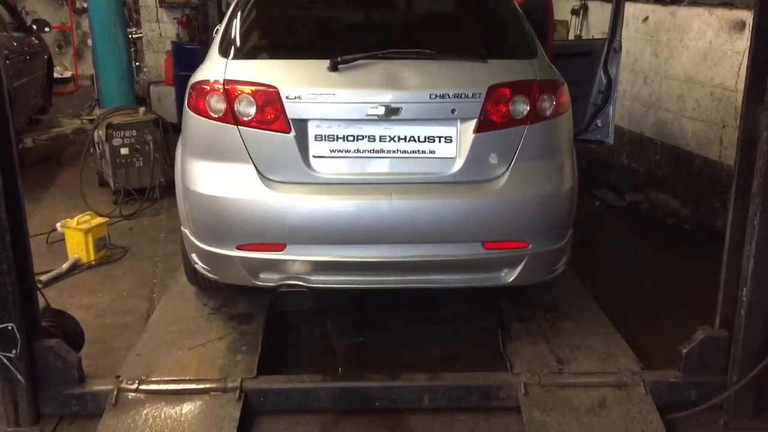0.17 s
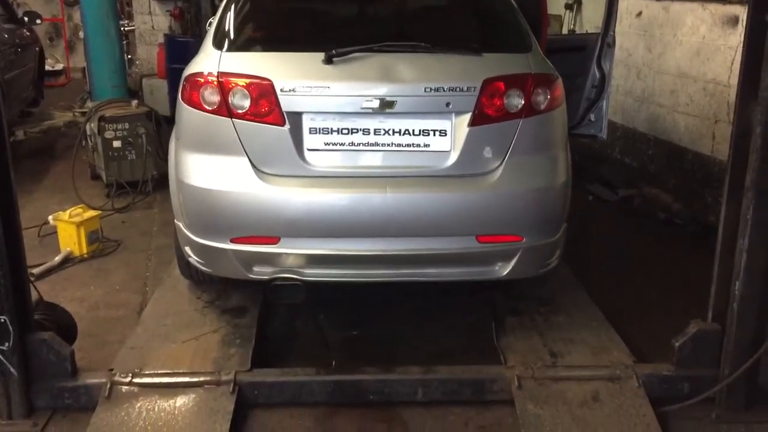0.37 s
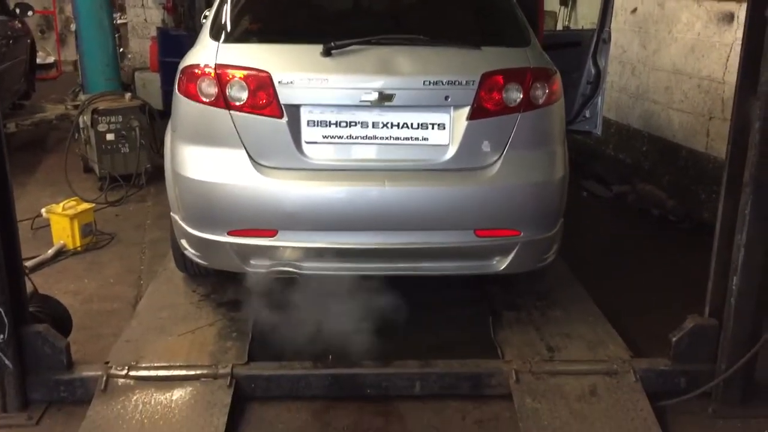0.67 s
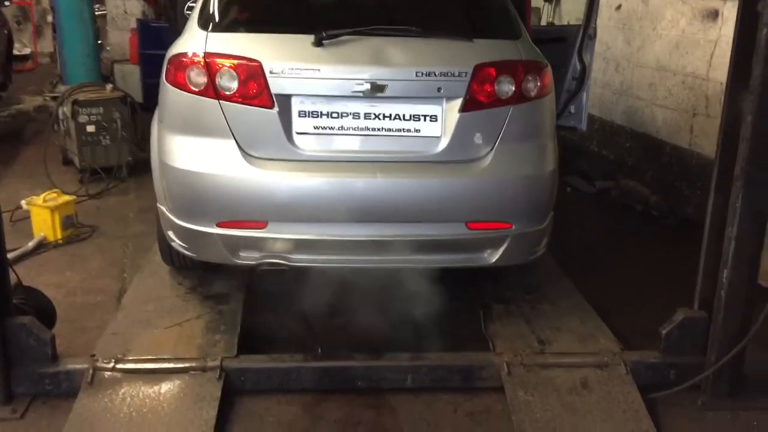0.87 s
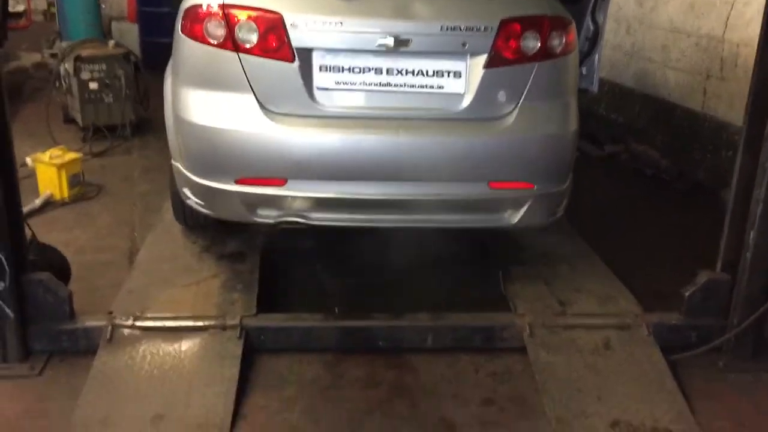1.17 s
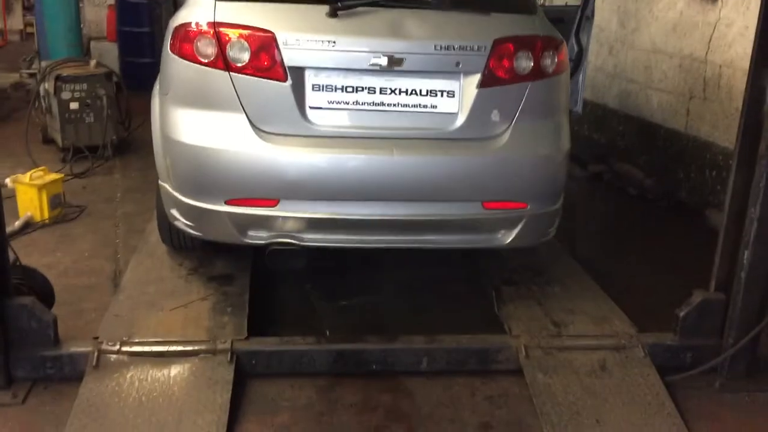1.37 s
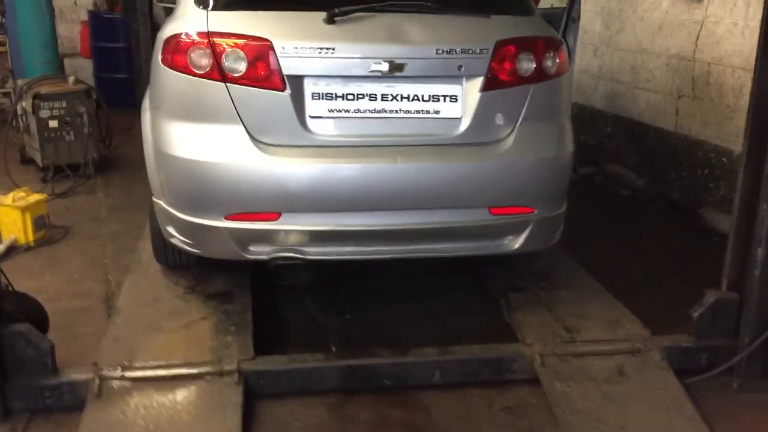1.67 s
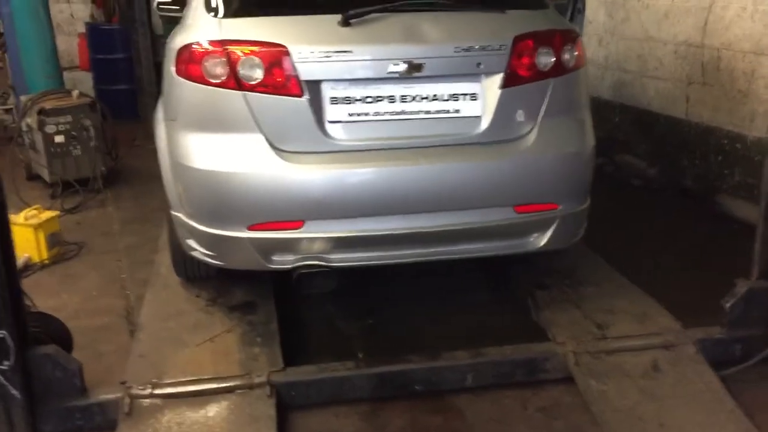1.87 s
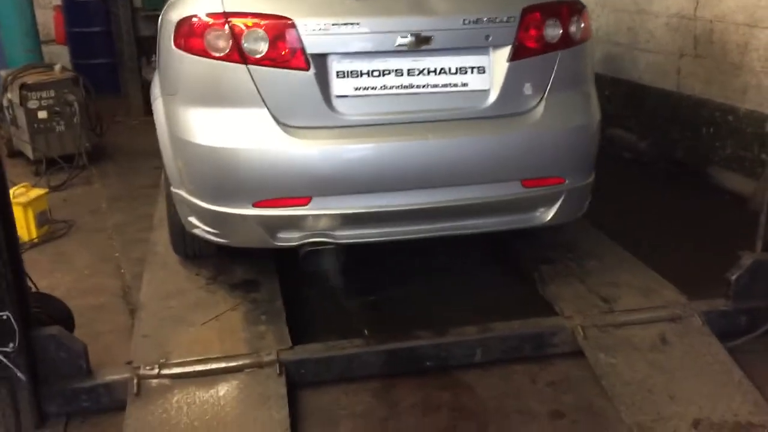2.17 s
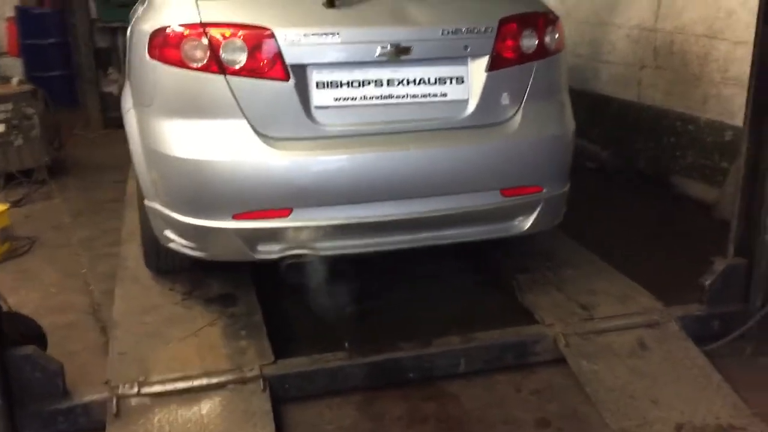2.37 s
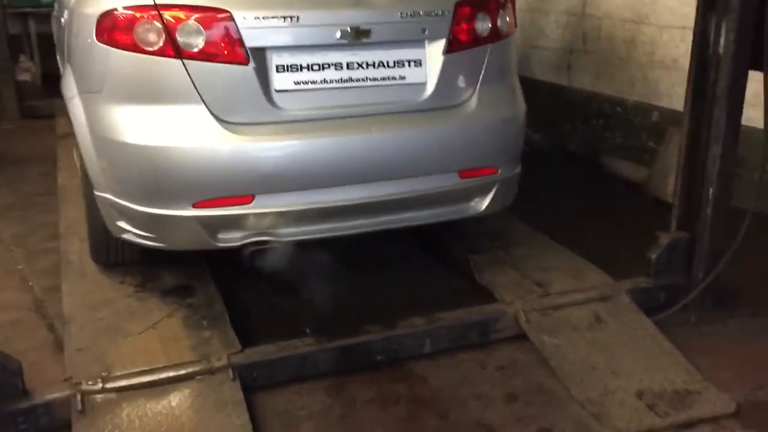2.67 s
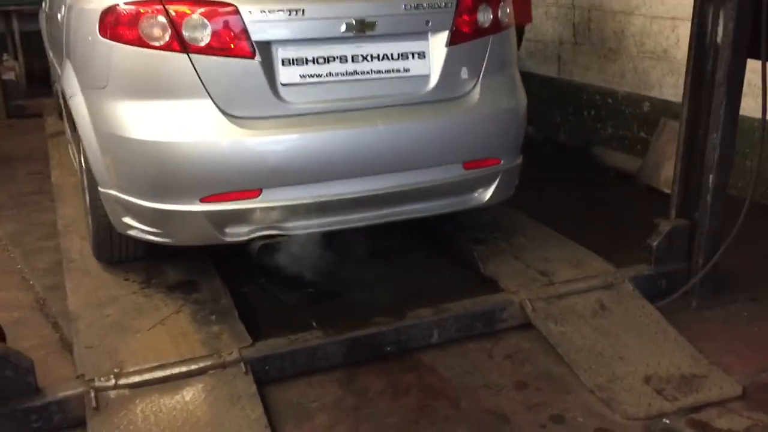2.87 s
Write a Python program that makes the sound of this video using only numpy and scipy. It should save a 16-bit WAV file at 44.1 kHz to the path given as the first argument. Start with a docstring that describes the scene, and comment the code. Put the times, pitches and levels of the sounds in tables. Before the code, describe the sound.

Heard near the tailpipe in a workshop, a four-cylinder car engine runs with a low, wavering drone and hiss. It is revved twice with a metallic rasp, then, after one brief click, gradually drops in pitch.

```python
"""A four-cylinder petrol engine, heard from behind its sports exhaust in a workshop.
From the start, puffs of exhaust make a low drone and set the pipe ringing, while gas, fan and belts hiss.
Tones swell and fade as they slide through the pitches that the pipe and room boost.
Two quick stabs of throttle, at 0.6 s and 1.2 s, hold the revs up, each with a rasping blast.
At 1.4 s comes one short click; then the engine winds down, with a faint zing near 2 s."""
import sys
import numpy as np
from scipy import signal
from scipy.fft import rfft, irfft, next_fast_len
from scipy.io import wavfile
from scipy.ndimage import map_coordinates

SR = 44100
rng = np.random.default_rng(int(sys.argv[2]) if len(sys.argv) > 2 else 0)


def store_wav(level_fs):
    """Save 16-bit WAV to argv[1]."""
    pcm = np.round(np.clip(np.atleast_2d(level_fs), -1, 1) * 32767)
    wavfile.write(sys.argv[1], SR, pcm.T.astype(np.int16))


N = 133182


def amp(db):
    """Turn decibels into a number to multiply by."""
    return 10 ** (np.asarray(db) / 20)


def unit(x):
    """Scale a sound to an average power of 1."""
    return x / np.sqrt(np.mean(x ** 2) + 1e-20)


def at_pitch(rows, hz):
    """Look up a table by frequency, blending between its rows."""
    f, values = np.transpose(rows)
    return np.interp(np.log(hz + 1), np.log(f + 1), values)


def curve(rows):
    """Join a table's points in time with straight lines."""
    return np.interp(np.arange(N) / SR, *np.transpose(rows))


def wobble(rate):
    """A smooth random curve through `rate` points a second."""
    return map_coordinates(rng.standard_normal(int(N * rate / SR) + 4), [np.arange(N) * rate / SR])


def swell(peak_s, length_s):
    """A smooth rise and fall around one moment."""
    return np.exp(-(2 * (np.arange(N) / SR - peak_s) / length_s) ** 2)


def tone(turns, multiple):
    """A pure tone of power 1 that vibrates `multiple` times per engine turn."""
    return np.sqrt(2) * np.sin(2 * np.pi * (multiple * turns + rng.random()))


def coloured(x, shape):
    """Boost and cut a sound's frequencies by a table, then scale it to power 1."""
    m = 2 * next_fast_len(N // 2 + SR // 4)
    cepstrum = irfft(np.log(amp(at_pitch(shape, np.fft.rfftfreq(m, 1 / SR)))), m)
    cepstrum[1:m // 2] *= 2
    cepstrum[m // 2 + 1:] = 0  # so ringing follows a puff and never comes before it
    return unit(irfft(rfft(x, m) * np.exp(rfft(cepstrum)), m)[:N])


# How long the room's echo takes to fade by 60 dB: f/Hz, t/s
ECHO_FADE = [(200, 1), (1500, 0.74), (5000, 0.35), (14000, 0.31)]

def workshop(x, echo_db):
    """The walls add a wash of echo; the overall power stays about the same."""
    hz, t, noise = signal.stft(rng.standard_normal(SR // 2), SR, nperseg=256)
    fade = np.exp(-np.log(1000) * t / at_pitch(ECHO_FADE, hz)[:, None])
    tail = signal.istft(noise * fade, SR, nperseg=256)[1]
    tail = np.pad(tail, (SR // 200, 0)) / np.linalg.norm(tail)  # starts 5 ms late
    echo = signal.fftconvolve(x, tail)[:N]
    return (x + amp(echo_db) * echo) / np.hypot(1, amp(echo_db))


# Engine speed in turns a second: t/s, f/Hz
ENGINE_SPEED = [(0, 90.7), (.05, 89.6), (.1, 87.08), (.39, 79.73), (.48, 77.6), (.55, 78.92), (.66, 81.18),
                (.86, 82.03), (1.02, 78.7), (1.12, 80.09), (1.25, 86.62), (1.33, 90.4), (1.41, 91.9),
                (1.49, 88.9), (1.61, 86.8), (1.68, 84.47), (1.88, 79.4), (2.01, 76.3), (2.16, 72.97),
                (2.21, 70.4), (2.4, 65.98), (2.55, 63.65), (2.62, 61.82), (2.83, 56.4), (3.02, 53.13)]

def crankshaft():
    """The engine's main shaft spins a little unevenly; gives its speed and its turns so far."""
    speed = curve(ENGINE_SPEED) * (1 + .001 * wobble(29.98))
    return speed, np.cumsum(speed) / SR


# Tones at 2, 3 and 4 times the engine speed: t/s, level/dB
FIRING_TONE = [(0, -12), (.13, -16.5), (.39, -13), (.52, -18.5), (.56, -27.5), (.61, -17), (.66, -12),
               (.7, -14), (.735, -23), (.79, -12.5), (.98, -13), (1.05, -15), (1.1, -31.5), (1.15, -15.5),
               (1.21, -11), (1.28, -17.5), (1.35, -35.5), (1.43, -13), (1.58, -17), (1.68, -12),
               (1.83, -14.5), (1.91, -16), (2.06, -9.5), (2.15, -14), (2.21, -20.5), (2.26, -35),
               (2.32, -22), (2.39, -22), (2.47, -26), (2.68, -26.5), (2.75, -39), (2.86, -33), (3.02, -26)]
THIRD_TONE = [(0, -22), (.16, -19.5), (.24, -35), (.3, -29), (.48, -34), (.54, -31), (.62, -24.5),
              (.69, -32.5), (.74, -43), (.8, -32), (1.05, -30), (1.15, -25.5), (1.28, -31), (1.38, -31.5),
              (1.48, -23.5), (1.55, -24.5), (1.63, -18), (1.72, -27.5), (1.88, -30.5), (2, -40),
              (2.07, -24.5), (2.23, -26.5), (2.34, -21.5), (2.5, -29.5), (2.57, -27), (2.63, -34),
              (2.78, -28.5), (3.02, -36.5)]
FOURTH_TONE = [(0, -30.5), (.2, -51), (.34, -36.5), (.46, -18.5), (.53, -29), (.59, -26), (.67, -34.5),
               (.8, -32.5), (.93, -45.5), (1.03, -20.5), (1.14, -36.5), (1.35, -30.5), (1.55, -48),
               (1.76, -33.5), (1.85, -23), (1.91, -15), (1.99, -30), (2.06, -31), (2.12, -30.5),
               (2.28, -27.5), (2.35, -47), (2.49, -18.5), (2.55, -26), (2.61, -17), (2.66, -25),
               (2.71, -27.5), (2.8, -23.5), (2.86, -12.5), (2.92, -14), (3.02, -15)]
# Weaker tones: multiple of engine speed, level/dB added to PIPE_AND_ROOM
WEAK_TONES = [(1, -0.5), (5, -6.5), (6, 0), (7, -9)]
# How loud the pipe and room make a weak tone at each pitch: f/Hz, level/dB
PIPE_AND_ROOM = [(50, -48), (72, -50), (80, -46), (88, -40.5), (270, -38), (300, -34), (318, -27),
                 (338, -38.5), (380, -36), (410, -45), (445, -42.5), (470, -41), (510, -52), (600, -55)]

def drone(turns, speed):
    """The engine fires twice a turn, so the exhaust hums at that rate, with other tones wavering along."""
    levels = [(3, curve(THIRD_TONE)), (4, curve(FOURTH_TONE))]
    levels += [(k, db + at_pitch(PIPE_AND_ROOM, k * speed)) for k, db in WEAK_TONES]
    others = sum(amp(db + 2.1 * wobble(29.99)) * tone(turns, k) for k, db in levels)
    firing = amp(curve(FIRING_TONE) + .3 * wobble(25)) * tone(turns, 2)
    return firing + others


# Each cylinder's puff in firing order, before `uneven` widens the gaps: level/dB
CYLINDER_PUFFS = [-2.8, 3.3, -3.5, 1.9]

def puffs(turns, uneven=1.4):
    """Each firing sends one puff down the pipe; at low revs their timing and size stumble."""
    stumble_below_hz, stumble_span_hz = 69, 12
    firing = np.arange(1, int(2 * turns[-1]))
    chance = rng.standard_normal((len(firing), 2))
    at = np.interp(firing / 2, turns, np.arange(N))  # in samples
    speed = SR / (2 * np.gradient(at))
    stumble = np.clip((stumble_below_hz - speed) / stumble_span_hz, 0, 1)
    late_s = (.00002 + .00013 * stumble) * chance[:, 0]
    scatter_db = (.7 + 1.5 * stumble) * chance[:, 1]
    at = np.clip(at + SR * late_s, 0, N - 2)
    size = amp(uneven * np.array(CYLINDER_PUFFS)[firing % 4] + scatter_db)
    i = at.astype(int)  # each puff is shared between two neighbouring samples
    return np.bincount(i, size * (1 - at + i), N) + np.bincount(i + 1, size * (at - i), N)


def swirl(pulses, decay_s):
    """Swirling gas leaves a burst of noise behind every puff."""
    bursts = signal.lfilter([1], [1, -np.exp(-1 / (SR * decay_s))], pulses)
    return unit(bursts * rng.standard_normal(N))


# Loudness of the pipe's low, middle and high ringing, before gain_db: t/s, level/dB
BARK_LEVEL = [(0, -24.5), (.08, -32), (.3, -31.5), (.48, -27), (.54, -30), (.6, -18), (.72, -24),
              (.81, -32), (.93, -27.5), (1.01, -24.5), (1.079, -33), (1.11, -25.5), (1.19, -18),
              (1.38, -31.5), (1.8, -33.5), (1.929, -27), (2.19, -31), (2.3, -30.5), (2.47, -25.5),
              (2.7, -32.5), (2.88, -26.5), (3.02, -37)]
RING_LEVEL = [(0.0, -33), (0.29, -34), (0.34, -42.5), (0.49, -33.5), (0.53, -45), (0.64, -24.5),
              (0.84, -40), (1.09, -33), (1.12, -25.5), (1.51, -37), (1.59, -33), (1.88, -40.5),
              (1.92, -33.5), (2.22, -39), (2.96, -42), (3.02, -38)]
RASP_LEVEL = [(0, -38.5), (.15, -42), (.42, -36.5), (0.481, -26.5), (.545, -40.5), (0.581, -26), (.62, -22),
              (.68, -28.5), (0.769, -41.5), (.88, -38), (1.02, -32.5), (1.075, -50), (1.11, -27),
              (1.16, -21), (1.249, -30), (1.36, -40.5), (1.86, -38), (1.961, -28.5), (2.14, -42.5),
              (2.5, -45.5), (3.02, -52)]
# The tone colour of each: f/Hz, level/dB
BARK_COLOUR = [(300, -58), (450, -13.5), (570, -6), (645, 1.5), (720, 2), (800, 2.5), (890, 0),
               (980, -13.5), (1090, -9), (1300, -53.5)]
RING_COLOUR = [(850, -32), (1100, -6), (1220, -2.5), (1300, 1), (1370, 4), (1430, -4.5), (1520, -3.5),
               (1800, -50)]
RASP_COLOUR = [(1200, -16.5), (1560, -5), (1780, 2.5), (1900, 2.5), (2080, -6), (2350, -15.5), (2800, -25),
               (3800, -53.5)]

def tailpipe(pulses):
    """The puffs and their swirl make the pipe sound a low bark, a hollow ring and a metallic rasp."""
    def ringing(colour, level, swirl_db, decay_s, echo_db, gain_db=0):
        clean = coloured(pulses, colour)
        gritty = amp(swirl_db) * coloured(swirl(pulses, decay_s), colour)
        return amp(curve(level) + gain_db) * unit(workshop(clean + gritty, echo_db))

    bark = ringing(BARK_COLOUR, BARK_LEVEL, swirl_db=-10, decay_s=.0011, echo_db=-1, gain_db=-1.5)
    ring = ringing(RING_COLOUR, RING_LEVEL, swirl_db=-5, decay_s=.0025, echo_db=2)
    rasp = ringing(RASP_COLOUR, RASP_LEVEL, swirl_db=-9, decay_s=.0026, echo_db=-4)
    return bark + ring + rasp


# Loudness of the hiss: t/s, level/dB
HISS_LEVEL = [(0, -37), (.5, -42), (.75, -37.5), (1.05, -41), (1.35, -37), (1.65, -37), (2, -40.5),
              (2.25, -44), (2.6, -44.5), (3.02, -43.5)]
# Tone colours of the hiss and the rumble: f/Hz, level/dB
HISS_COLOUR = [(400, -17), (800, 3.5), (1400, 2), (2000, 2.5), (2800, -2), (3500, -2), (4300, -6.5),
               (5300, -9.5), (6600, -9.5), (7500, -15.5), (9500, -19), (10500, -24), (12000, -21),
               (15500, -29)]
RUMBLE_COLOUR = [(20, -28), (45, -3), (80, -16), (150, 16.5), (300, 15.5), (420, 6), (550, -5),
                 (1000, -42.5)]

def rush(turns):
    """Gas, fan and belts hiss over a low rumble; the hiss flutters with each firing."""
    flow = rng.standard_normal(N) * (1 + .11 * np.cos(2 * np.pi * 2 * turns))
    hiss = amp(curve(HISS_LEVEL) + .33 * wobble(14)) * coloured(flow, HISS_COLOUR)
    rumble = amp(-32.5 + 3.7 * wobble(8)) * coloured(rng.standard_normal(N), RUMBLE_COLOUR)
    return hiss + rumble


# Tones that swell briefly: peak t/s, length/s, multiple of engine speed, level/dB
SINGING_TONES = [(0.253, 0.13, 15, -41), (0.46, 0.2, 8, -30.5), (0.608, 0.098, 8, -17.5),
                 (0.632, 0.11, 1, -40), (0.636, 0.19, 10, -25), (0.733, 0.081, 8, -22.5),
                 (1.002, 0.061, 8, -29.5), (1.001, 0.079, 10, -25), (1.162, 0.13, 8, -27.5),
                 (1.23, 0.09, 10, -25.5), (1.24, 0.18, 1, -36.5), (1.35, 0.12, 16, -30),
                 (1.59, 0.27, 15, -30.5), (1.658, 0.15, 8, -33.5), (1.93, 0.26, 8, -31.5),
                 (1.945, 0.13, 17, -32.5), (2.295, 0.17, 10, -31), (2.549, .16, 5, -26.5),
                 (2.533, 0.22, 6, -33.5), (2.868, 0.12, 8, -35.5)]

def singing(turns):
    """Engine tones sing out for a moment as they pass a pitch that the pipe or room boosts."""
    return sum(amp(db + 1.7 * wobble(40)) * swell(peak_s, length_s) * tone(turns, k)
               for peak_s, length_s, k, db in SINGING_TONES)


# Throttle stabs: peak t/s, hold/s, drop during the hold/dB, release/s, level/dB before gain_db
THROTTLE_STABS = [(0.616, 0.032, 1.5, 0.063, -27), (1.153, 0.14, 9, .1, -27.5)]
# Tone colour of their hiss: f/Hz, level/dB
BLAST_COLOUR = [(400, -28), (1000, -6), (2300, 6.5), (2850, -8.5), (3150, 1.5), (3350, 3.5), (3600, 6),
                (3900, -3.5), (4400, 1), (5000, -4.5), (6300, -2), (7500, -8.5), (10000, -13.5),
                (12500, -23.5), (15500, -28)]

def blasts(turns, gain_db=3):
    """With the throttle open each firing spits a jet of hiss, every second one harder."""
    rise_s, range_db = .077, 31.5  # the level moves this far in one rise or one release
    sharpness, weak_jet_db, between_jets_db = 5, -5, -11
    t = np.arange(N) / SR
    throttle = np.zeros(N)
    for peak_s, hold_s, drop_db, release_s, db in THROTTLE_STABS:
        before = np.maximum(peak_s - t, 0) / rise_s
        held = np.clip((t - peak_s) / hold_s, 0, 1)
        after = np.maximum(t - peak_s - hold_s, 0) / release_s
        throttle += amp(db - drop_db * held - range_db * (before + after))
    crank = np.cos(2 * np.pi * turns)
    strong_jet = np.exp(sharpness * (-crank - 1))
    weak_jet = amp(weak_jet_db) * np.exp(sharpness * (crank - 1))
    jets = (amp(between_jets_db) + strong_jet + weak_jet) * rng.standard_normal(N)
    return amp(gain_db) * workshop(throttle * coloured(jets, BLAST_COLOUR), echo_db=-3)


def click(at_s=1.4233, level_db=-6.5, decay_s=.0012):
    """One short click with no echo."""
    age = (np.arange(N) / SR - at_s) / decay_s
    return -amp(level_db) * (age >= 0) * (1 - age) * np.exp(-np.abs(age))


# Tone colour of the zing: f/Hz, level/dB
ZING_COLOUR = [(2400, -30), (3000, -5), (3250, 1), (3550, -12.5), (4500, -14.5), (8000, -41)]

def zing(pulses, level_db=-39):
    """As the revs fall, the puffs briefly set off a faint, high ringing in the pipe."""
    ringing = coloured(unit(pulses) + swirl(pulses, decay_s=.0024), ZING_COLOUR)
    return amp(level_db) * workshop(swell(peak_s=1.97, length_s=.067) * ringing, echo_db=4.5)


def scene():
    """Add up the sounds; the spinning shaft keeps the engine's parts in step."""
    speed, turns = crankshaft()
    hum = drone(turns, speed)
    pulses = puffs(turns)
    mix = hum + tailpipe(pulses) + rush(turns) + singing(turns) + blasts(turns) + click() + zing(pulses)
    return mix[None]


def record(dry):
    """Fade the sound in quickly and cut off the very highest treble."""
    fade_s, top_hz = .006, 15600
    m = next_fast_len(N + SR // 2)
    fade_in = np.sin(np.pi / 2 * np.minimum(np.arange(N) / (SR * fade_s), 1)) ** 2
    below_top = np.fft.rfftfreq(m, 1 / SR) < top_hz
    return irfft(rfft(dry * fade_in, m) * below_top, m)[..., :N]


dry = scene()
out = record(dry)
store_wav(out)
```